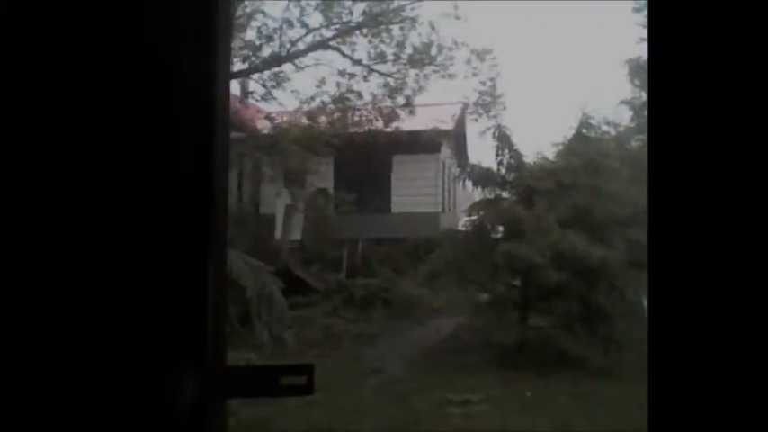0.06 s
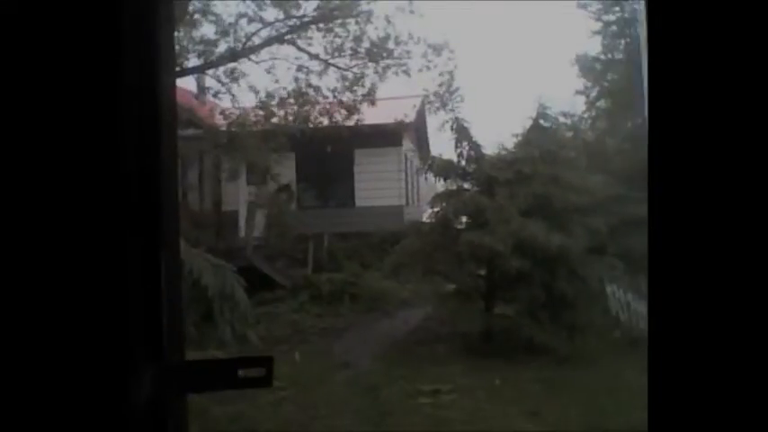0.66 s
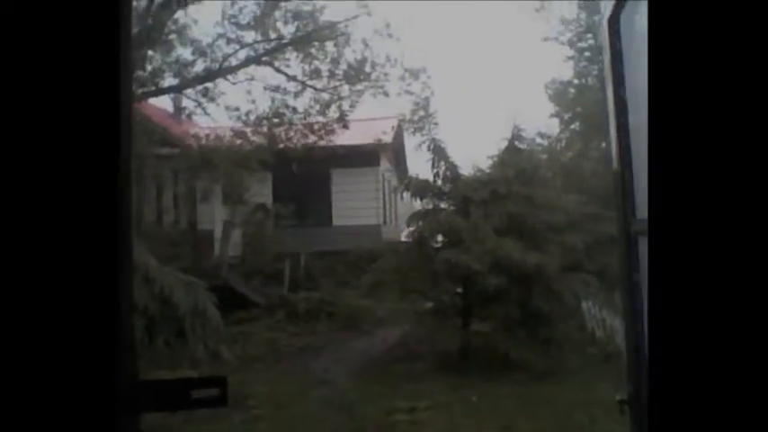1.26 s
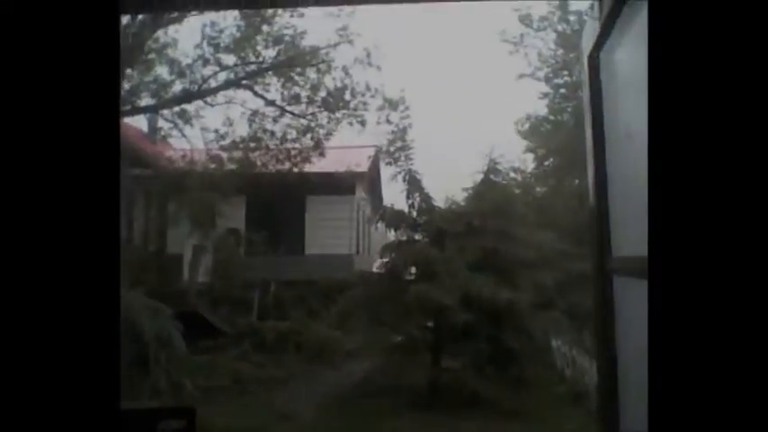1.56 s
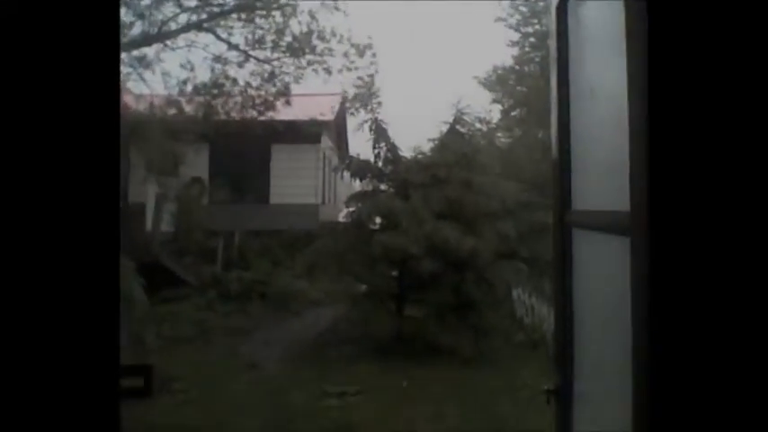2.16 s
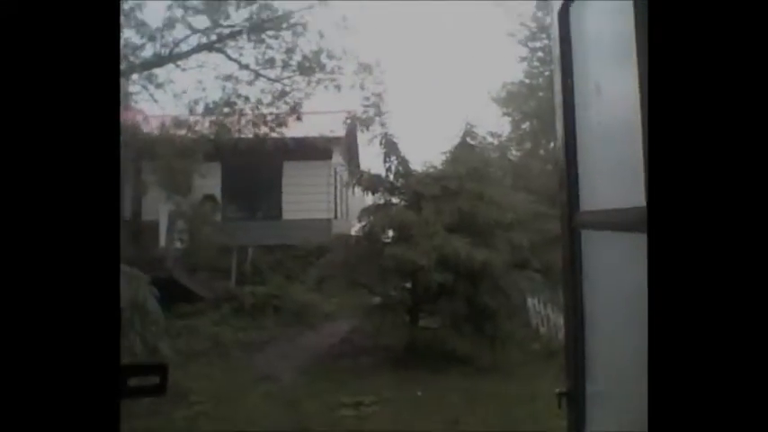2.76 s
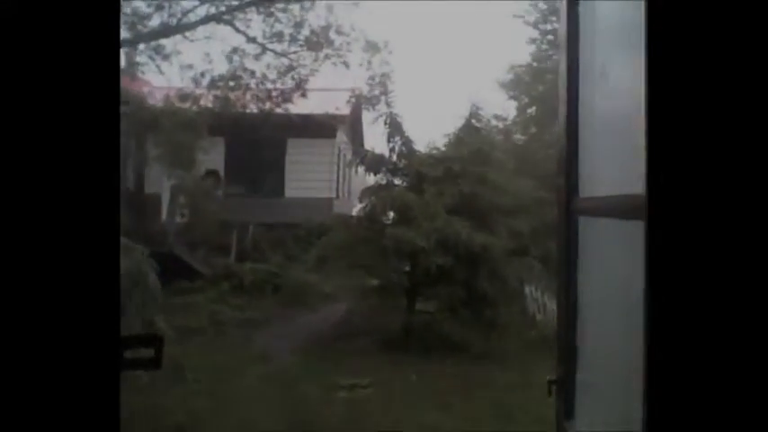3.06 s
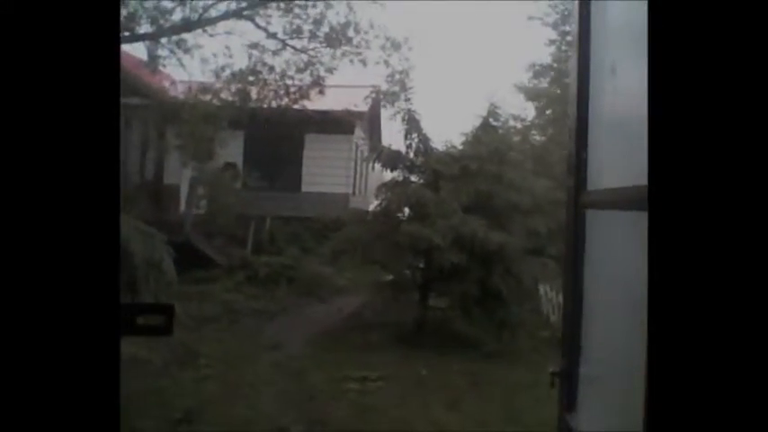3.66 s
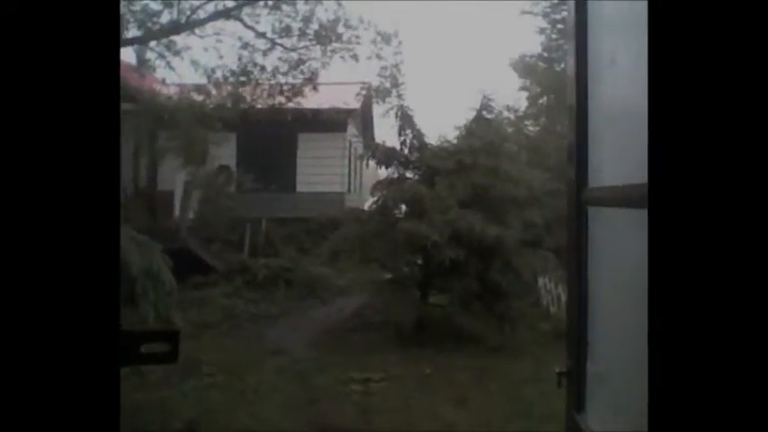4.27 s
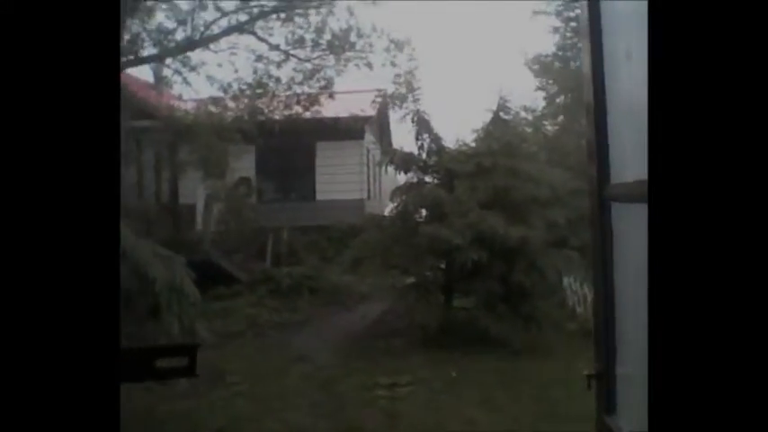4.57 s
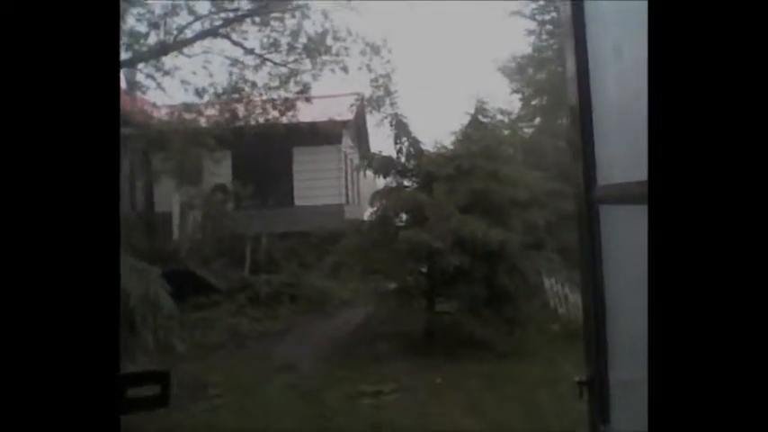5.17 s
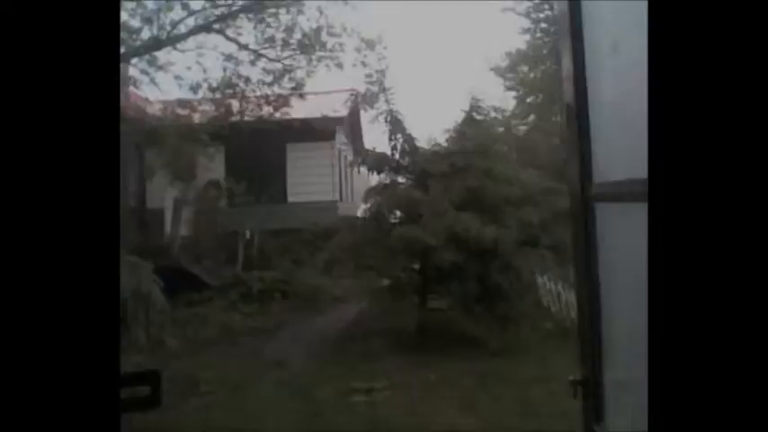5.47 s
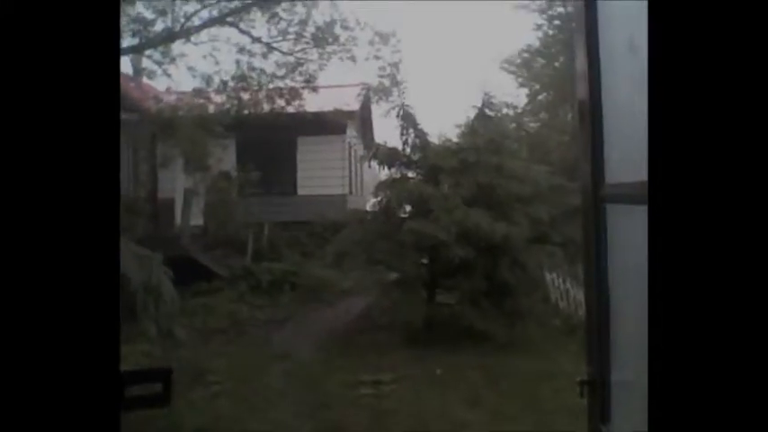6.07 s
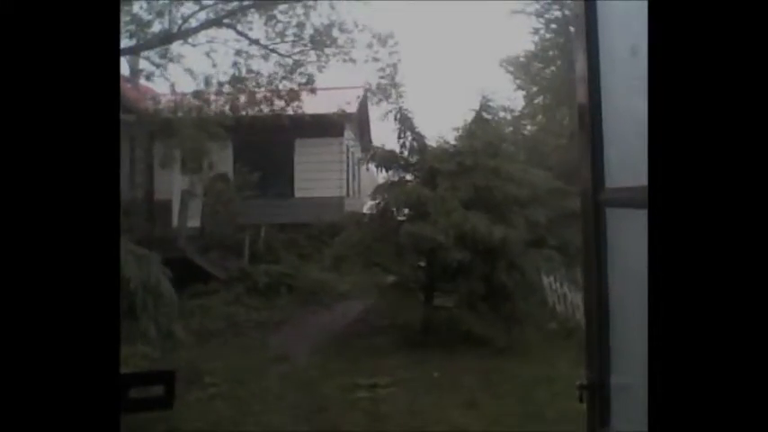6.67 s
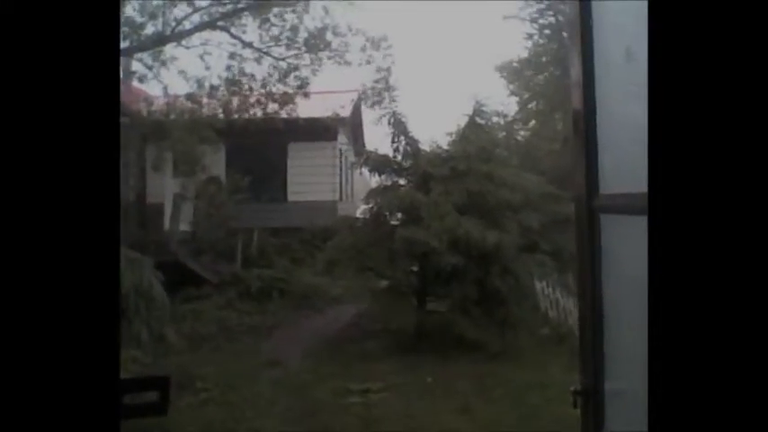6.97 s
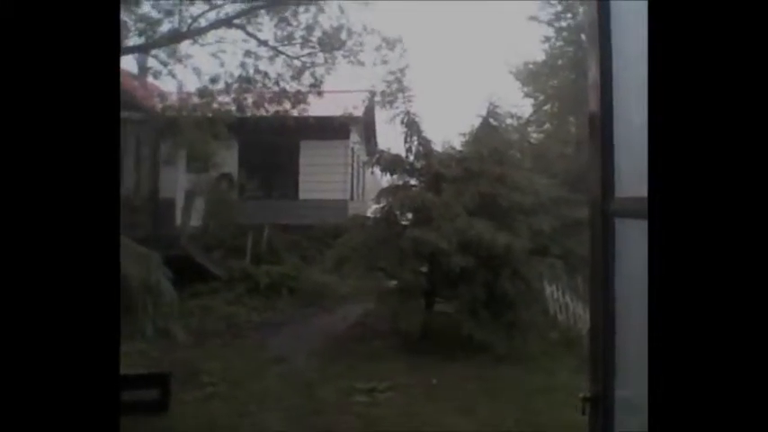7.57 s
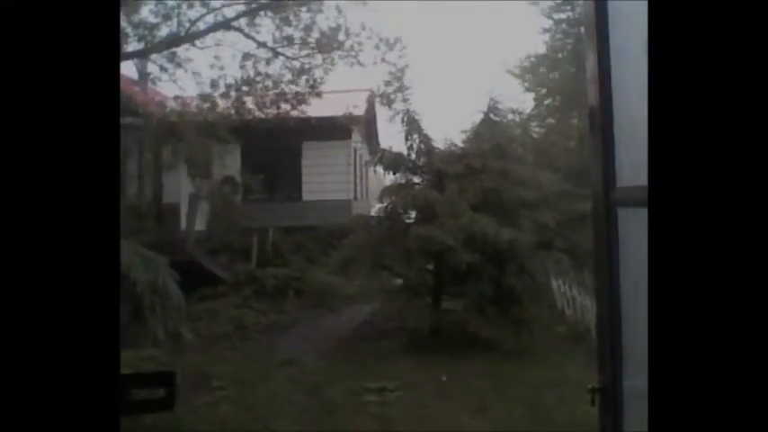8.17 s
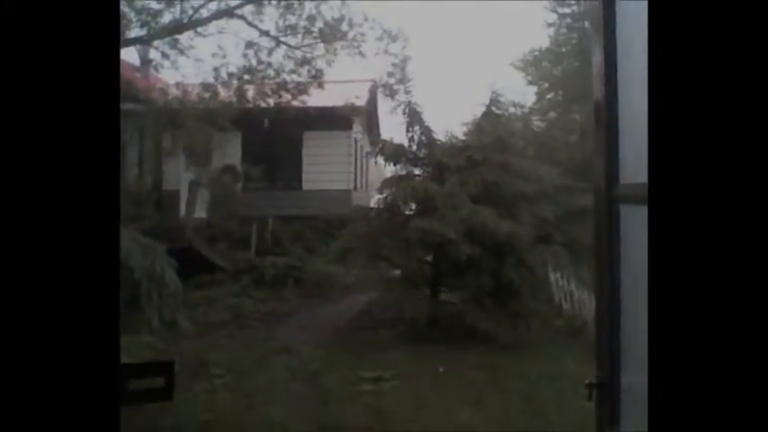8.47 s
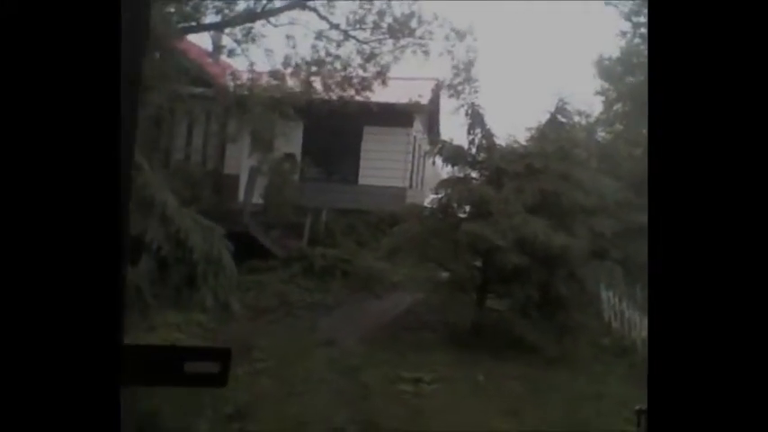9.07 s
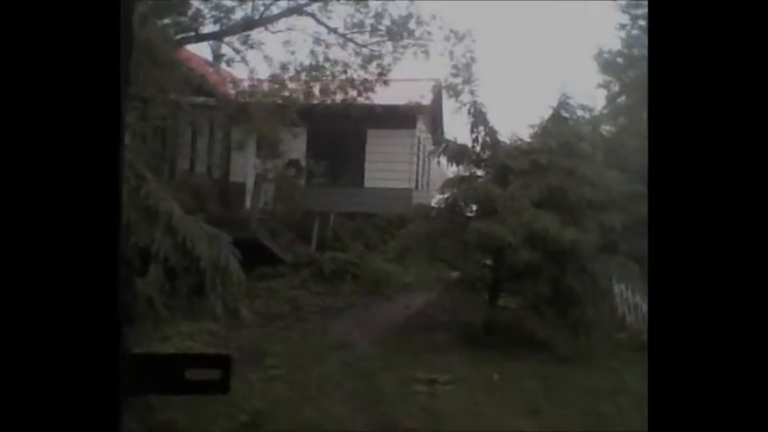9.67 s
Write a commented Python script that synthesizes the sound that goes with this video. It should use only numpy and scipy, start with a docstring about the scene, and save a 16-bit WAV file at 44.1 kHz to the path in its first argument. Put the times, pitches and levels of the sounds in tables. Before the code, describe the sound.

Sharp, bright drips land near a doorway, each a click with a tiny splash, while rain patters on foliage and washes softly farther off. A low mains hum and faint hand rumble sit underneath. Toward the end the microphone is carried indoors with a few dull bumps; the hum dies away, and the rain turns quieter, with a short room echo on the drips.

```python
"""A wooded yard in steady rain, from an open doorway, one handheld microphone. Fat drops from the eaves smack
the ground close by, each a click and a little spray. Further out, fine patter on leaves and the wash of far
rain; underneath, a mains hum and hand rumble. Near 7 s the microphone is moved and falls into the shelter of
the room: rain and hum fade, the drops echo, and the handling thuds softly."""
import sys
import numpy as np
from scipy import signal
from scipy.fft import rfft, irfft, next_fast_len
from scipy.io import wavfile
from scipy.ndimage import uniform_filter1d

SR = 44100
rng = np.random.default_rng(int(sys.argv[2]) if len(sys.argv) > 2 else 0)


def unload_audio(sound):
    """Save the sound as a 16-bit wav file, at the path given as the first command line argument."""
    columns = np.transpose(np.atleast_2d(sound))
    # keep every value between -1 and 1, then stretch to whole-number steps
    steps = np.round(np.clip(columns, -1, 1) * 32767)
    wavfile.write(sys.argv[1], SR, steps.astype(np.int16))


N = 433062
TIME = np.arange(N) / SR


# the fattest drops, close by: t/s, relative level/dB, f/Hz, width/octaves, relative spray level/dB
EAVES_DROPS = [(0.0973, -1.5, 8740, 0.46, -30), (0.198, -9, 8650, .35, -24),
               (0.3285, -4.5, 6900, 0.42, -22), (0.5275, 1.5, 6900, .21, -22), (0.5705, -5, 6640, .24, -28),
               (0.5926, 0.5, 8150, .3, -27), (0.6685, -5.5, 7500, 0.42, -26),
               (0.695, -4.5, 6450, 0.24, -23), (0.7921, -2, 6000, 0.43, -27), (0.836, -7.5, 7400, .42, -29),
               (0.901, -5.5, 8300, .45, -26), (1.278, -7.5, 6750, 0.23, -15.5), (1.332, -7, 6000, .42, -26),
               (1.344, -5, 5200, .34, -25), (1.4178, -3.5, 7000, 0.23, -28), (1.655, -9, 4930, 0.54, -24),
               (1.6716, -9.5, 6140, .6, -17), (1.6983, -6.5, 6600, 0.45, -21), (1.8068, -4, 3700, .8, -27),
               (1.8218, -2, 6100, 0.24, -21.5), (1.8854, -3, 7500, 0.43, -23), (1.931, -4, 6140, 0.31, -20),
               (2.0753, -9, 6300, .16, -17), (2.1475, 2, 6640, .17, -20), (2.16, -1, 7200, 0.68, -26),
               (2.2216, -1, 7200, 0.38, -24), (2.35, -6, 5870, .29, -21.5), (2.399, -7, 5300, 0.48, -23),
               (2.4769, 1, 6300, 0.34, -21), (2.5804, -10.5, 6000, .23, -16), (2.64, -4, 8300, 0.31, -26),
               (2.8962, -4, 8500, .32, -25), (3.037, -11, 5200, .3, -23), (3.083, -8.5, 7440, 0.3, -17),
               (3.2501, -8.5, 5000, 1, -28), (3.4952, -5, 7400, 0.24, -18.5), (3.6626, -3, 5130, 0.43, -21),
               (3.6982, -6, 3930, 0.72, -24), (3.7944, -11, 6700, .13, -15.5),
               (3.8445, -13.5, 2900, .24, -22), (4.12, -8, 7300, 0.44, -21), (4.156, -9.5, 8650, 0.13, -21),
               (4.413, -8, 6350, 0.29, -20), (4.649, -11, 6900, .5, -14), (4.927, -1.5, 6340, .5, -29),
               (5.005, -8.5, 7100, .5, -21), (5.0274, -3, 6700, .28, -22.5), (5.1827, -4, 8300, 0.65, -25),
               (5.3184, -6, 8200, 0.44, -19), (5.347, -7.5, 7600, .29, -16), (5.3725, -4.5, 6400, .16, -24),
               (5.404, -4.5, 6500, .33, -30), (5.567, -8.5, 6800, .25, -18.5),
               (5.592, -5.5, 6000, .41, -27), (5.9415, -6.5, 6200, 0.28, -23),
               (6.1486, -6.5, 6860, 0.27, -23), (6.1977, -7.5, 5900, 0.3, -21.5),
               (6.2928, -5, 6100, .37, -26), (6.3965, -6, 6150, 0.3, -28), (6.6595, -9, 5950, .36, -19),
               (6.936, -5, 6600, 0.42, -32), (6.968, -11, 6000, 0.39, -15.5), (6.99, -22.5, 2500, .15, -11),
               (7.094, -23, 2900, .22, -20), (7.187, -16, 6030, 0.18, -9.5),
               (7.282, -18, 5200, 0.21, -13.5), (7.793, -21, 2800, 0.55, -27),
               (7.879, -12.5, 6640, 0.2, -18), (8.246, -22.5, 5200, .5, -18),
               (8.836, -17.5, 6050, 0.35, -15), (9.185, -23, 5870, 0.45, -15),
               (9.476, -24, 7800, .32, -13.5), (9.758, -19.5, 5730, 0.44, -12.5)]
def eaves_drops(level_db=-0.83, early_s=.0011):
    """Close: fat drops from the eaves hit the ground, each with its own size and pitch."""
    out = np.zeros(N)
    for s, db, hz, octaves, spray_db in EAVES_DROPS:
        add(out, s - early_s, gain_of(db + level_db) * drop(hz, octaves, spray_db))
    return out


def drop(hz, octaves, spray_db, touch_db=-13, lead_s=.001, echo_db=-13, spray_s=0.014,
         mist_db=-14, mist_s=0.023, clumpy_db=3.0, droplet_db=9, size=3000):
    """A light first touch, the smack, echoes from wall and step, then spray and falling droplets."""
    t = np.arange(size) / SR
    click = smack(hz, octaves)
    scatter = rng.standard_normal(size)
    scatter *= gain_of(clumpy_db * np.repeat(rng.standard_normal(size), 40)[:size])
    spray = evened(np.convolve(scatter, click)[:size])
    fade = (t > 2 * lead_s) * (np.exp(-t / spray_s) + gain_of(mist_db) * np.exp(-t / mist_s))
    out = gain_of(spray_db + 2.0) * spray * fade
    add(out, 0, gain_of(touch_db) * click)
    add(out, lead_s, click * rng.choice([-1, 1]))
    for echo_s in rng.uniform([.003, .005], [.0038, .0062]):
        add(out, echo_s, gain_of(echo_db) * click)
    droplet = smack(1.3 * hz, octaves + 0.14)  # smaller, so brighter
    for fall_s, weight in rng.uniform([.005, .3], [.024, 1], (2, 2)):
        add(out, fall_s, weight * gain_of(spray_db + droplet_db) * droplet)
    return out


# colour that the microphone gives every impact: f/Hz, level/dB
MIC_COLOUR = [(1500, 6.5), (3300, 9), (4400, 5.5), (5600, 5.5), (7000, 8.5), (9000, 5.5), (12000, 4.5),
              (14000, 0), (16000, -7), (22000, -30)]
def smack(hz, octaves, skirt_db=-23, skirt_reach=2.2, size=512):
    """The click of one impact, envelope peak 1: a few cycles around hz, with a sudden start."""
    f = np.abs(np.fft.fftfreq(size, 1 / SR)) + 1
    hump = np.exp(-(np.log2(f / hz) / max(octaves, .1)) ** 2 / 4)
    skirt = gain_of(skirt_db) / (1 + (1200 / f) ** 2)
    skirt /= 1 + (f / (skirt_reach * hz)) ** 4  # the skirt falls away above the pitch, so lower drops are duller
    log_spectrum = np.log((hump + skirt) * gain_of(at_hz(MIC_COLOUR, f)) + 1e-4)
    minimum_phase = np.exp(np.conj(signal.hilbert(log_spectrum)))
    click = np.fft.ifft(minimum_phase).real[:size // 4]
    return click / np.abs(signal.hilbert(click)).max()


# strength of the rain at the microphone: t/s, far wash level/dB, patter level/dB (both relative)
RAIN_LEVELS = [(0, -42, -34), (2.8, -41.5, -34.5), (4.2, -41, -32), (5.9, -43, -33), (6.9, -43.4, -34),
               (7.55, -47, -39.5), (8.3, -47, -39), (9.82, -46.5, -43)]
def yard_patter(leaves_db=-4, ticks_db=-6.0, drips_db=-6.5, taps_db=-5.5):
    """Out in the yard: patter on leaves, fine ticks, lesser drips, and dull taps that follow the wash."""
    wash_db, patter_db = follow(RAIN_LEVELS)
    leaves = patter(per_s=170, hz=6500, spread=0.25, size_db=7.5, width=0.22, spray_db=-21.5)
    ticks = patter(per_s=120, hz=8800, spread=0.31, size_db=9.5, width=0.31, spray_db=-25.5)
    drips = patter(per_s=18, hz=6800, spread=0.33, size_db=2.0, width=.3, spray_db=-21, count=120)
    taps = patter(per_s=110, hz=3160, spread=0.51, size_db=6.0, width=0.58, spray_db=-22.5)
    bright = gain_of(leaves_db) * leaves + gain_of(ticks_db) * ticks + gain_of(drips_db) * drips
    return gain_of(patter_db) * bright + gain_of(wash_db + taps_db) * taps


def patter(per_s, hz, spread, size_db, width, spray_db, count=200):
    """Drops at random moments, many small and a few large, up to spread octaves either side of hz."""
    kinds = [drop(hz * 2 ** octave, width * rng.uniform(0.45, 1.9), spray_db)
             for octave in np.linspace(-spread, spread, count)]
    out = np.zeros(N)
    for when, kind, chance in rng.random((int(per_s * N / SR), 3)):
        size = min(-np.log(chance), np.e)
        add(out, when * N / SR, gain_of(size_db * size) * kinds[int(kind * count)])
    return evened(out)


# far rain as heard in the doorway, and in the room: f/Hz, spectral level/dB
DOOR_WASH = [(40, 8), (110, -5), (150, -4.5), (180, -2), (330, 1), (460, -1.5), (1400, -1), (3200, -1.5),
             (4400, -3), (6800, 5.5), (9000, -1), (12000, -6), (16000, -21.5)]
ROOM_WASH = [(40, 14), (110, 2.5), (240, -2), (360, 1), (1100, 1), (2000, -2), (4400, -1.5), (6800, 3.5),
             (9000, -2), (12000, -6.5), (15000, -21), (16000, -14)]
# resonances of the doorway: f/Hz, width/Hz, lift/dB
DOOR_RESONANCES = [(1060, 150, 1.5), (1690, 230, 2.5), (2380, 480, 4), (3280, 390, 3.5)]
def far_wash(inside, door_db=6.5, room_db=4.5, patchy_db=1.0):
    """Far off: countless drops merge to a hiss that drifts in patches; the doorway colours it."""
    def door_colour(f):
        lift = sum(db / (1 + (2 * (f - hz) / width) ** 2) for hz, width, db in DOOR_RESONANCES)
        return at_hz(DOOR_WASH, f) + lift

    door = gain_of(door_db) * noise(door_colour)
    room = gain_of(room_db) * noise(lambda f: at_hz(ROOM_WASH, f))
    hiss = np.sqrt(1 - inside) * door + np.sqrt(inside) * room
    bands = signal.stft(hiss, nperseg=512)[2]
    patches = uniform_filter1d(rng.standard_normal(bands.shape), 14, axis=0)  # smooth in frequency
    patches = evened(uniform_filter1d(patches, 8, axis=1))  # and in time
    drifting = signal.istft(bands * gain_of(patchy_db * patches), nperseg=512)[1][:N]
    return gain_of(follow(RAIN_LEVELS)[0]) * drifting


# decay of the room behind the doorway: f/Hz, t60/s
ROOM_DECAY = [(500, 0.57), (3000, 0.2), (7000, 0.32), (14000, 0.43)]
def room_echo(x, build_s=0.0013, dull_hz=10000):
    """Indoors: a dense tail, dulled by the walls, in which each band dies at its own speed."""
    hz, t, bands = signal.stft(rng.standard_normal(SR // 2), SR, nperseg=256)
    decay = gain_of(-60 * t / at_hz(ROOM_DECAY, hz)[:, None])
    build = 1 - np.exp(-t / build_s)
    walls = 1 / np.sqrt(1 + (hz[:, None] / dull_hz) ** 6)
    tail = signal.istft(bands * decay * build * walls, SR, nperseg=256)[1]
    return signal.fftconvolve(x, tail / np.linalg.norm(tail))[:N]


# partials of the hum: harmonic number, relative level/dB
HUM_HARMONICS = [(1, -3.5), (3, -32), (5, -27)]
def mains_hum(mains_hz=60, level_db=-37.5, leave_s=5.93, reach_s=1.13):
    """By the door: a mains tone whose field falls with distance cubed as the microphone moves off."""
    distance = np.hypot(1, np.maximum(TIME - leave_s, 0) / reach_s)
    tone = sum(gain_of(db) * np.sin(2 * np.pi * mains_hz * k * TIME) for k, db in HUM_HARMONICS)
    return gain_of(level_db) * evened(tone) / distance ** 3


# rumble of air and hand: t/s, relative level/dB
RUMBLE_LEVELS = [(0, -48), (1, -50), (2.1, -36.5), (3.1, -44.5), (5.4, -48.5), (6.3, -41), (7.5, -41),
                 (8.6, -42), (9.82, -30.5)]
# colour of that rumble: f/Hz, spectral level/dB
RUMBLE_SPECTRUM = [(2, -3.5), (9, 12.5), (16, 0), (28, -16), (42, -29), (70, -25), (130, -52), (400, -90)]
# soft bumps of the hand: t/s, level/dB, f/Hz, length/s
HAND_BUMPS = [(6.817, -37, 69.44, 0.066), (6.83, -44, 133, 0.056), (6.845, -33, 29, .11),
              (6.993, -34.5, 32, 0.13), (7.531, -30, 43, 0.16), (7.921, -38.5, 50, 0.16),
              (8.076, -36, 32, 0.12), (8.46, -31, 21.2, .2), (8.943, -42, 68, 0.096),
              (8.972, -46, 157, 0.041), (8.96, -34, 23.2, .15), (9.22, -49.5, 115, 0.05),
              (9.477, -37, 43, 0.072)]
def handling(rumble_db=-1):
    """On the microphone itself: deep rumble of air and hand, and dull bumps as it is carried."""
    rumble = noise(lambda f: at_hz(RUMBLE_SPECTRUM, f))
    out = gain_of(follow(RUMBLE_LEVELS)[0] + rumble_db) * rumble
    for s, db, hz, length in HAND_BUMPS:
        t = np.arange(0, length, 1 / SR)
        swell = np.sin(np.pi * t / length) ** 2
        add(out, s, gain_of(db) * swell * np.sin(2 * np.pi * (hz * t + rng.random())))
    return out


def gain_of(db):
    """Decibels to amplitude."""
    return 10 ** (np.asarray(db) / 20)


def evened(x):
    """Scales to rms 1."""
    return x / np.sqrt(np.mean(x ** 2) + 1e-20)


def follow(rows):
    """The columns of a time table, interpolated at every sample."""
    s, *columns = np.transpose(rows)
    return [np.interp(TIME, s, column) for column in columns]


def at_hz(points, hz):
    """A frequency table, interpolated on a log axis."""
    f, value = np.transpose(points)
    return np.interp(np.log(hz + 1), np.log(f + 1), value)


def add(mix, s, sound):
    """Mixes a sound in at time s."""
    part = mix[max(round(s * SR), 0):][:len(sound)]
    part += sound[:len(part)]


def noise(colour_db):
    """Noise of rms 1 whose spectrum is the function colour_db(Hz)."""
    size = next_fast_len(N)
    hz = np.fft.rfftfreq(size, 1 / SR)
    spectrum = rfft(rng.standard_normal(size)) * gain_of(colour_db(hz))
    return evened(irfft(spectrum, size)[:N])


# shelter of the microphone: t/s, shelter (0 open in the doorway, 1 fully in the room's shelter)
MIC_PATH = [(6.4, .015), (7.5, 0.32), (7.9, 0.86)]
def scene(door_wet_db=-16, room_wet_db=2, shade_db=-6.5):
    """From open doorway to shelter: the walls shade the patter and the echo takes over."""
    inside = follow(MIC_PATH)[0]
    drops = yard_patter() * gain_of(shade_db * inside) + eaves_drops()
    wet = gain_of(door_wet_db + (room_wet_db - door_wet_db) * inside)
    mono = drops + wet * room_echo(drops) + far_wash(inside) + mains_hum() + handling()
    return np.array([mono, mono])


def record(dry, edge_hz=15950):
    """One microphone on both channels: full-scale limit, then the band limit."""
    limited = np.clip(dry, -1, 1)
    lowpass = signal.firwin(511, edge_hz, window=("kaiser", 9), fs=SR)
    return signal.oaconvolve(limited, lowpass[None], "same")


dry = scene()
out = record(dry)
unload_audio(out)
```